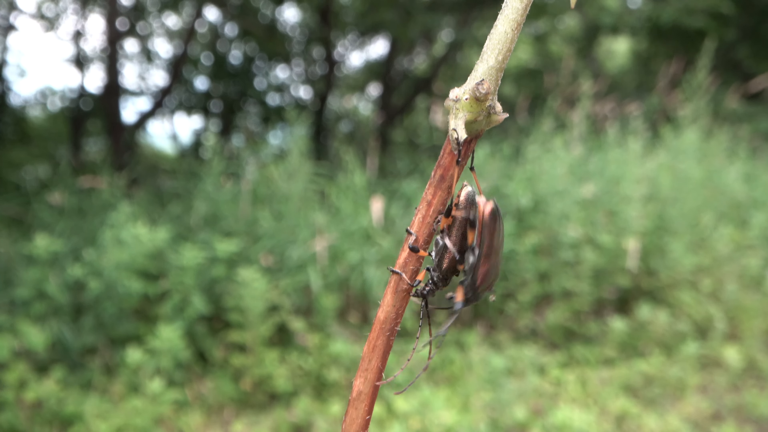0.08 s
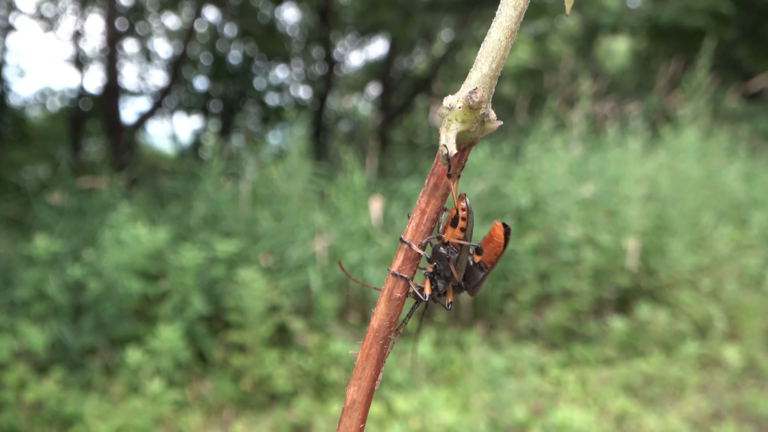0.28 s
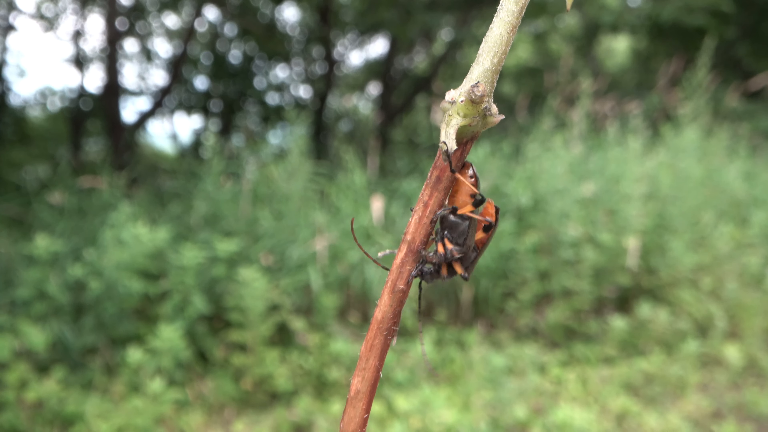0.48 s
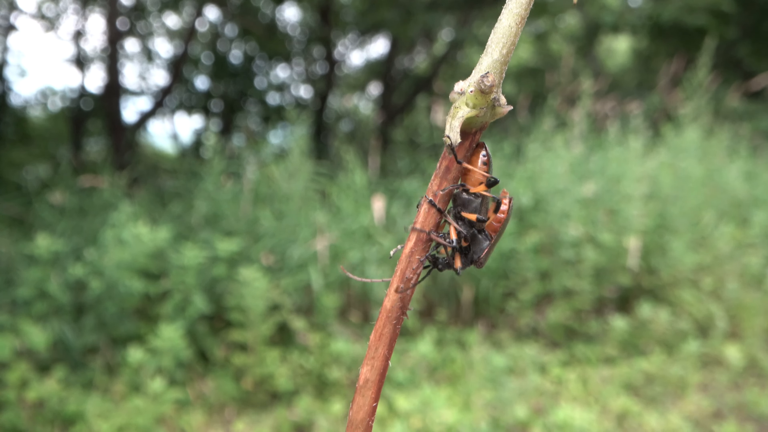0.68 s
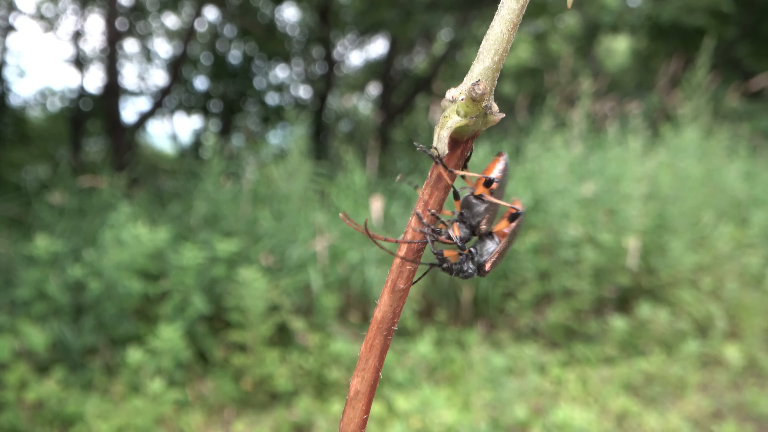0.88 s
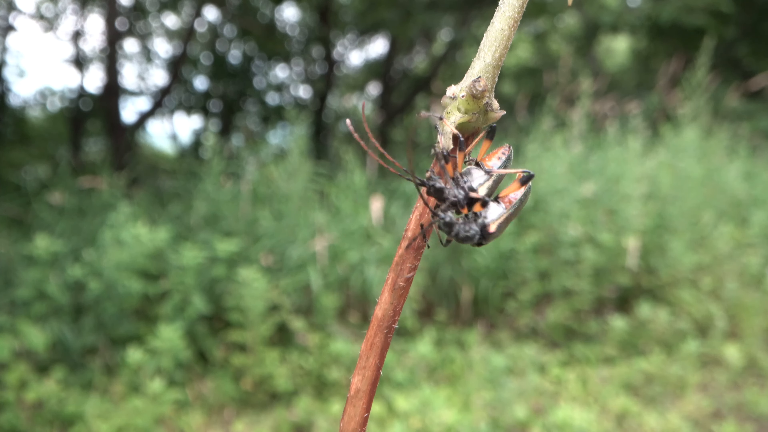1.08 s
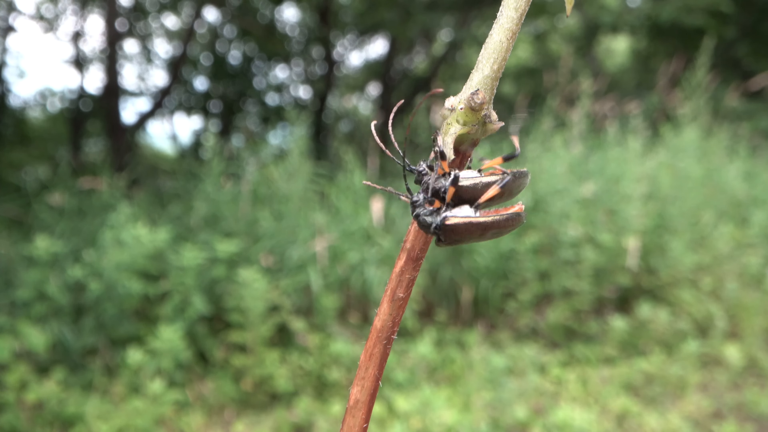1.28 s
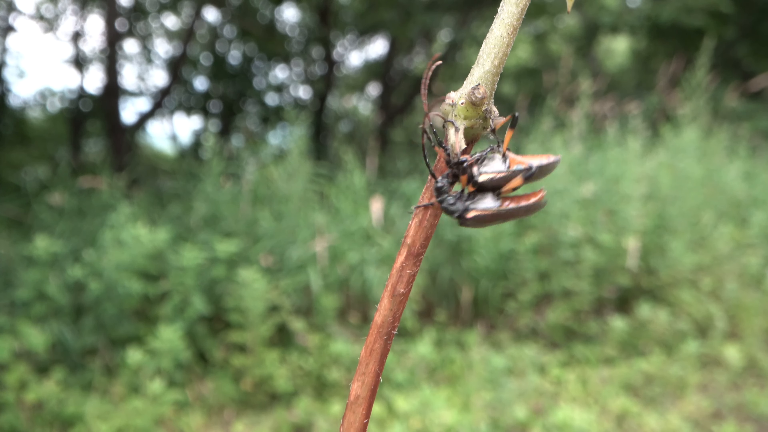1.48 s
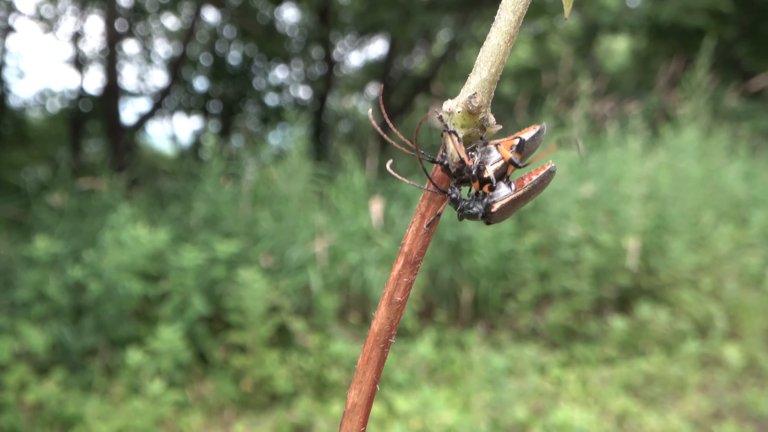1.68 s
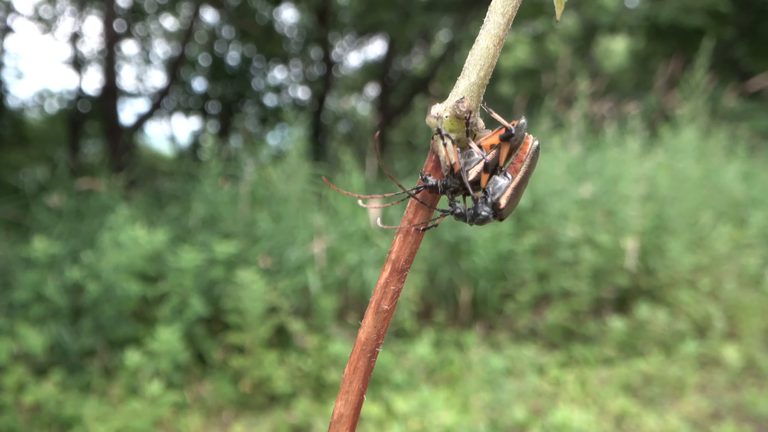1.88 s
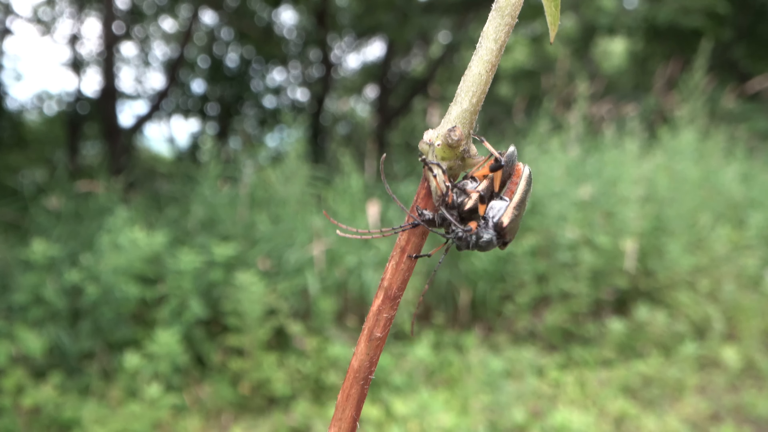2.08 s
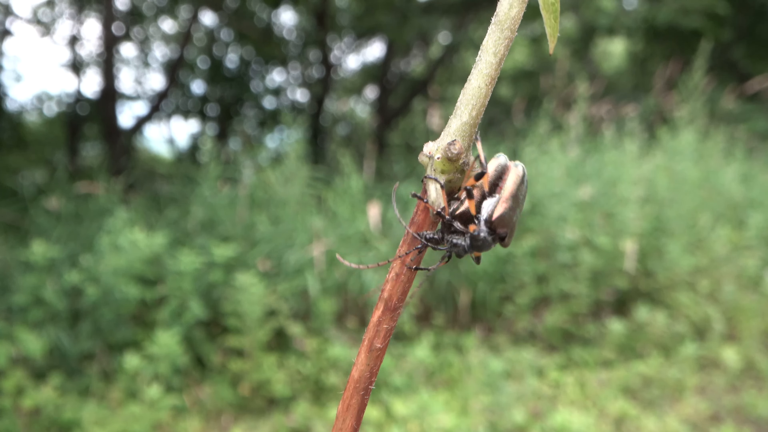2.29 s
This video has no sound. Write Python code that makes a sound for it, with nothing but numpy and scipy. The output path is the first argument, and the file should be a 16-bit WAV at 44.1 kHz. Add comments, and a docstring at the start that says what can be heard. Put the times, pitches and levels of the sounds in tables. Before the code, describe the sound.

Beetle claws crackle and scrape on a plant stem, very close, thinning into scattered ticks

```python
"""Beetles grappling on a stem

Two mating beetles grapple on a plant stem, heard from very close: a busy first second, then scattered ticks.
Claws snap and scrape (sharp slips), legs knock dully (soft bumps), and twice a shell squeaks (regular slips).
Each of these contacts, and the faint shuffling of feet, sets off the same few resonances of the stem.
The stem then rings on as decaying noise, over a low rumble of swaying and a steady rush."""
import sys
import numpy as np
from scipy import signal
from scipy.fft import rfft, irfft
from scipy.io import wavfile
from scipy.ndimage import uniform_filter1d

SR = 44100
rng = np.random.default_rng(int(sys.argv[2]) if len(sys.argv) > 2 else 0)


def master(y):
    """Save y as 16-bit WAV."""
    cut = np.clip(np.atleast_2d(y).T, -1, 1)
    pcm = np.round(cut * 32767)  # scale
    wavfile.write(sys.argv[1], SR, pcm.astype(np.int16))


N = 103635  # length in samples
EDGE_HZ = 15900  # upper edge of the sound
SNAP_S = .004  # room for one snap and its afterslips; also sets the scale of snaps and knocks


def amp(db):
    """Turns decibels into a plain factor."""
    return 10 ** (np.asarray(db) / 20)


def evened(x):
    """Scales a sound to an average (RMS) level of one."""
    return x / np.sqrt(np.mean(x ** 2) + 1e-20)


def read(points, hz):
    """Joins points by straight lines on a log-frequency axis."""
    f, value = np.transpose(points)
    return np.interp(np.log(hz + 1), np.log(f + 1), value)


def add(mix, s, sound):
    """Lays a sound into the mix at s seconds, cutting off what runs past the end."""
    part = mix[max(round(s * SR), 0):][:len(sound)]
    part += sound[:len(part)]


# Claws letting go. Each row: time in seconds, relative level in dB, extra bass in dB, extra treble in dB.
SNAPS = [(0.1609, -40, 6, -9), (0.2101, -32.5, 5, 2.5), (0.2272, -19.5, 3, -10), (0.244, -26.5, 1, 4),
         (0.2453, -28.5, 6, -13), (0.2508, -23, 8.5, -1), (0.26, -19, 9.5, -2.5), (0.2773, -31, 12, 3.5),
         (0.2987, -27, 9.5, -16), (0.309, -25, 1, -22), (0.32, -23.5, 8.5, 2.5), (0.394, -25.5, 15.5, 0),
         (0.3991, -19.5, -4, -0.5), (0.4147, -24, 16.5, 2), (0.4193, -24.5, 15, 6),
         (0.4245, -20.5, -11, 2.5), (0.4304, -23, 4, 4), (0.4398, -22, 8, -9), (0.4616, -19.5, -1, 8.5),
         (0.476, -21, -7, 5), (0.4876, -20.5, 3, -9), (0.5091, -14.5, -0.5, -11), (0.5239, -19.5, -18, 7),
         (0.5266, -26, 4, 13), (0.5985, -37, -10, -9), (0.6398, -17.5, 0.5, -10), (0.641, -14.5, -8, -3.5),
         (0.6731, -25, 9, 3), (0.7408, -29, 7.5, 1), (0.7473, -26, -2, -17), (0.7619, -23, 3.5, 1),
         (0.7638, -20, -17, -1.5), (0.7966, -14.5, 5.5, 9), (0.7991, -13.5, -16, 4.5),
         (0.7983, -7.5, -5.5, -9), (0.8021, -11, 1.5, -15), (0.8043, -14.5, -5.5, 4),
         (0.8078, -25.5, 10, 6), (0.831, -27.5, -2, -2), (0.8436, -23, 2.5, -6), (0.8638, -30.5, 4, -9),
         (0.8774, -20.5, -1, 5.5), (0.8856, -12.5, -2.5, 3), (0.8871, -8.5, 2.5, 4.5),
         (0.8879, -15.5, 2.5, -3), (0.9059, -15, 8, -10), (0.973, -24.5, -41, -6), (1.0337, -31, -11, -15),
         (1.1059, -33, 1, 9), (1.1559, -35, 3, -9), (1.2227, -37, 7, 6), (1.2579, -44, 11, 7),
         (1.3053, -32, -9, -2.5), (1.311, -34, 2, -1), (1.3334, -33, 0, -36), (1.3953, -29.5, -1, -33),
         (1.4494, -29, 16.5, -22), (1.4617, -24, 13, -3), (1.4715, -30.5, 6, 3), (1.4893, -35.5, -4, 16),
         (1.4992, -25.5, 5, -2), (1.538, -31, -2, -9), (1.6692, -26.5, 0, -10), (1.7039, -28, 9, 3.5),
         (1.861, -27.5, 11.5, 5.5), (1.9132, -32, 8, 2), (1.9346, -12, -63, 2.5), (1.9474, -24, 10, 13.5),
         (1.9918, -31.5, -30, 1.5), (2.0273, -34.5, 13.5, 5.5), (2.0362, -28, 12, -12),
         (2.0633, -26, 10, -4), (2.0746, -35, 18, 2), (2.09, -30.5, -4, 0), (2.188, -34.5, 4, -4),
         (2.3214, -24.5, -19, -7)]
AFTERSLIP_S, AFTERSLIP_DB = .0016, -15.5  # latest start of an afterslip, and its typical level
CATCH_S = .00014  # an afterslip catches again this soon, so it has little bass


def snaps(count=4):
    """A claw lets go: one sharp slip, then a few weak ones that catch again at once."""
    out = np.zeros(N)
    chances = rng.random((len(SNAPS), count, 2))
    for (s, db, bass_db, treble_db), chance in zip(SNAPS, chances):
        push = np.zeros(round(SR * SNAP_S))
        push[0] = 1
        for when, size in chance:
            slip = amp([AFTERSLIP_DB]) * (2 * size - 1) * 2
            add(push, when * AFTERSLIP_S, slip)
            add(push, when * AFTERSLIP_S + CATCH_S, -slip)
        sound = np.convolve(push, tick(s, bass_db, treble_db, top_db=-1))
        add(out, s, sound * amp(db) / np.linalg.norm(push))
    return out * np.sqrt(SNAP_S * SR)


# Dragging strokes. Each row: start in seconds, length before the release is added in seconds,
# relative level in dB, extra bass in dB, extra treble in dB.
SCRAPES = [(0.198, 0.067, -42.5, 10.5, 2), (0.235, 0.053, -37.5, 11, -7), (0.295, 0.068, -35.5, 9, 4),
           (0.39, 0.058, -27.5, 11.5, -1.5), (0.45, 0.031, -23, 2, -0.5), (0.486, 0.069, -35.5, 6, 3.5),
           (0.539, 0.06, -33, 6.5, 4), (0.611, 0.036, -28, 8, -1), (0.664, 0.04, -39, 9, -7),
           (0.779, 0.012, -31, 6, 2), (0.793, 0.022, -21.5, 3, -2), (0.823, 0.03, -32.5, 2.5, -1),
           (0.88, 0.042, -27.5, 4, -3.5), (0.925, 0.023, -21.5, 1, 10.5), (0.951, 0.022, -26.5, -2, 7.5),
           (0.99, 0.12, -49.5, -2, 7), (1.088, 0.033, -41.5, 6.5, 10), (1.141, 0.031, -45, 14, 5.5),
           (1.198, 0.033, -43.5, 8.5, 6), (1.293, 0.054, -46, 6, -10), (1.381, 0.034, -41, 14.5, 0),
           (1.456, 0.039, -24.5, 7, -6.5), (1.497, 0.026, -41, 5, 4.5), (1.528, 0.026, -31, 3, -2),
           (1.563, 0.057, -46.5, -1, 0), (1.663, 0.03, -40.5, 16.5, -1), (1.725, 0.052, -49.5, 19, -13),
           (1.841, 0.021, -42.5, 12, 1), (1.905, 0.071, -46, 10, 0), (2.02, 0.029, -38.5, 12.5, -8),
           (2.057, 0.024, -34, 13.5, -13), (2.092, 0.042, -45.5, 11.5, -0.5),
           (2.195, 0.053, -53.5, 25, -12), (2.322, 0.032, -45, 12, -5)]
SCRAPE_DB, SCRAPE_SAG_DB = -0.5, -1  # overall level; change of level along a stroke
SCRAPE_ATTACK_S, SCRAPE_RELEASE_S = 0.0038, 0.0082


def scrapes(count=4):
    """Several claws drag over bark and shell: dense slips under a short stroke."""
    out = np.zeros(N)
    trains = [slips(2 * N) for claw in range(count)]
    for s, length, db, bass_db, treble_db in SCRAPES:
        t = np.arange(0, length + SCRAPE_RELEASE_S, 1 / SR)
        rise, fall = t / SCRAPE_ATTACK_S, (t[-1] - t) / SCRAPE_RELEASE_S
        stroke = np.clip(np.minimum(rise, fall), 0, 1)
        level = amp(db + SCRAPE_SAG_DB * (t / length - .5))
        for train in trains:
            drive = evened(train[round(s * SR):][:len(t)]) * stroke * level
            add(out, s, signal.fftconvolve(drive, tick(s, bass_db, treble_db, top_db=0)))
    return out * amp(SCRAPE_DB) / np.sqrt(count)


GRAINS_PER_S, GRAIN_SPREAD_DB = 990, 3.5  # average number of slips; how unequal they are


def slips(count):
    """A random train of tiny slips, a few much larger than the rest."""
    size = amp(GRAIN_SPREAD_DB * np.minimum(rng.exponential(1, count), 4))
    sign = rng.choice([-1, 1], count)
    happens = rng.random(count) < GRAINS_PER_S / SR
    return evened(size * sign * happens)


# Where the tone of a hard contact can be bent, from bass to the very top.
LOW_HZ, BASS_HZ, MID_HZ, RING_LO_HZ, RING_HI_HZ, TREBLE_HZ, TOP_HZ = 232, 652, 1110, 2050, 3900, 7400, 10200
LOW_DB = -3  # added to the extra bass at the lowest point
MID_DB, MID_SHARE = -1, 0.53  # the lower mids take a share of the extra bass


def tick(s, bass_db, treble_db, top_db):
    """A hard contact, darker or brighter around the main resonance."""
    tone = [(LOW_HZ, bass_db + LOW_DB), (BASS_HZ, bass_db), (MID_HZ, MID_DB + MID_SHARE * bass_db),
            (RING_LO_HZ, 0), (RING_HI_HZ, 0), (TREBLE_HZ, treble_db), (TOP_HZ, treble_db + top_db)]
    return contact(s, tone, 2300, 5000, grip=1)


# How the stem answers a contact. Each row: frequency in Hz, relative level in dB.
STEM = [(25, -29), (45, -29), (70, -20), (100, -17.5), (145, -10.5), (200, -6.5), (260, 0), (380, -4.5),
        (500, -7), (670, -3), (820, -10), (1000, -16), (1200, -11.5), (1750, -11), (2120, -8), (2350, -9),
        (2560, -2.5), (2820, -3.5), (3230, 3), (3500, 0.5), (4000, -12), (4900, -12), (5400, -24),
        (5850, -17), (6650, -24.5), (7250, -13), (7620, -6.5), (8050, -15.5), (8800, -23), (10700, -27),
        (12200, -35), (14500, -35.5), (16000, -50)]
# One resonance rises as the beetles climb toward the node of the stem, after sinking a little at first.
# Each row: time in seconds, frequency in Hz.
CLIMB = [(.2, 1620), (.5, 1450), (.9, 1440), (1.3, 1860), (2.3, 1840)]
CLIMB_DB, CLIMB_WIDTH = 6.5, 0.092  # height of that resonance; width as a share of its frequency
GRIP_SPREAD, GRIP_PATCH_DB = 0.018, 2.5  # each foothold shifts and recolours the resonances
TRAVEL_S = 0.000982  # lag of a 1 kHz bending wave; higher ones arrive sooner


def contact(s, tone, lo_hz, hi_hz, grip=0, size=2048):
    """The stem's answer to one contact at time s, treble first, scaled by its energy in a band."""
    signed = np.fft.fftfreq(size, 1 / SR)
    hz = abs(signed)
    chance = grip * rng.standard_normal(25)
    places = np.linspace(0, np.sqrt(EDGE_HZ), len(chance) - 1)
    patches = np.interp(np.sqrt(hz), places, chance[1:])
    climb_hz = np.interp(s, *np.transpose(CLIMB))
    moving = np.exp(-.5 * ((hz / climb_hz - 1) / CLIMB_WIDTH) ** 2)
    stem_db = read(STEM, hz * np.exp(GRIP_SPREAD * chance[0]))
    gain = amp(stem_db + read(tone, hz) + GRIP_PATCH_DB * patches + CLIMB_DB * moving)
    gain = gain / np.sqrt(np.mean(gain ** 2 * (hz > lo_hz) * (hz < hi_hz)))
    # The Hilbert step makes each resonance start at once; the turns then delay the low waves most.
    prompt = np.conj(signal.hilbert(np.log(gain)))
    turns = 2 * TRAVEL_S * np.sign(signed) * np.sqrt(1000 * hz)
    return np.fft.ifft(np.exp(prompt - 2j * np.pi * turns)).real[:size // 2]


# Dull bumps of legs and bodies. Each row: time in seconds, relative level in dB, upper pitch in Hz.
KNOCKS = [(.254, -24.5, 1060), (.339, -17.5, 775), (0.35, -18, 820), (0.4208, -18.5, 557), (.445, -23, 764),
          (.4675, -17.5, 620), (0.553, -27.5, 970), (.652, -21, 760), (1.151, -23.5, 560),
          (1.288, -27.5, 464), (1.399, -31, 706), (1.437, -22, 630), (1.477, -19, 593), (1.5, -20.5, 563),
          (1.7213, -20.5, 547), (1.745, -23, 614), (1.822, -20.5, 493), (1.883, -25, 450),
          (1.892, -22, 497), (1.8985, -25, 544), (2.12, -27.5, 710), (2.232, -27, 635)]
# Tone of a knock. Each row: multiple of its pitch, relative level in dB.
KNOCK_TONE = [(.06, -6), (.25, -9), (.55, 3.5), (1, 0), (1.8, -11), (4.5, -25), (14, -39)]
KNOCK_DB = -2.5  # overall level


def knocks():
    """Soft bumps drive mostly the low resonances; those with a higher pitch reach further up."""
    out = np.zeros(N)
    for s, db, hz in KNOCKS:
        tone = [(multiple * hz, level) for multiple, level in KNOCK_TONE]
        add(out, s, amp(db) * contact(s, tone, 120, 1000, grip=1))
    return out * amp(KNOCK_DB) * np.sqrt(SNAP_S * SR)


# Stick-slip squeaks, one curve each. Each row of a curve: time in seconds, slips per second in Hz, level in dB.
SQUEAKS = [
    [(1.763, 1030, -38), (1.772, 1028, -30), (1.778, 883, -28.5), (1.784, 1061, -29.5), (1.803, 1007, -27),
     (1.811, 1160, -25), (1.818, 1180, -39)],
    [(2.256, 770, -54), (2.265, 858, -40), (2.276, 940, -38.5), (2.281, 1185, -45), (2.289, 1160, -33.5),
     (2.306, 1263, -38), (2.316, 1090, -50)],
]
# Character of each squeak. Each row: extra treble in dB, pitch jitter as a share of the pitch.
SQUEAK_TONES = [(5, 0.069), (-1.5, 0.037)]
# Tone shared by the squeaks. Each row: frequency in Hz, relative level in dB.
SQUEAK_TONE = [(300, -23), (1000, 0.5), (1400, -6), (2100, 2.5), (2600, -1.5), (3300, 1.5), (4800, 1.5),
               (7000, -0.5), (8200, 7), (10500, -4), (15000, 1)]
SQUEAK_GRIT = .25  # share of noise mixed into the slips


def squeaks():
    """Shell slides on shell, and the slips fall into a nearly regular train."""
    out = np.zeros(N)
    noises = rng.standard_normal((len(SQUEAKS), N))
    for curve, (treble_db, jitter), noise in zip(SQUEAKS, SQUEAK_TONES, noises):
        s, hz, db = np.transpose(curve)
        t = np.arange(s[0], s[-1], 1 / SR)
        wobble = evened(uniform_filter1d(noise[:len(t)], size=30))
        rate = np.interp(t, s, hz) * (1 + jitter * wobble)
        turns = np.cumsum(rate) / SR
        pulses = evened(sum(np.cos(2 * np.pi * k * turns) for k in range(1, 14)))
        train = pulses + SQUEAK_GRIT * noise[-len(t):]
        # The extra treble is a bump around TREBLE_HZ.
        tone = [(f, level + treble_db * np.exp(-np.log2(f / TREBLE_HZ) ** 2 * 10))
                for f, level in SQUEAK_TONE]
        sound = signal.fftconvolve(train, contact(s[0], tone, 2300, 5000))[:len(t)]
        add(out, s[0], evened(sound) * amp(np.interp(t, s, db)))
    return out


# Faint shuffling of feet between the strokes. Each row: time in seconds, relative level in dB.
SHUFFLE = [(0, -66.5), (.13, -59), (.2, -55.5), (.38, -47), (.6, -44), (.73, -46), (.99, -44),
           (1.07, -49.5), (1.269, -51), (1.44, -48.5), (1.63, -54), (1.8, -47.5), (1.9, -50), (2.0, -49),
           (2.16, -58), (2.23, -55.5), (2.35, -49.5)]
# Tone of the shuffling. Each row: frequency in Hz, relative level in dB.
SHUFFLE_TONE = [(100, 9.5), (200, 10), (380, 17.5), (700, 10.5), (1100, -3), (1900, 4), (3200, -0.5),
                (7500, 0.5), (14000, 5)]


def shuffle():
    """Feet never quite rest: tiny random slips make a faint, dull patter."""
    level = amp(np.interp(np.arange(N) / SR, *np.transpose(SHUFFLE)))
    step = contact(N / SR / 2, SHUFFLE_TONE, 2300, 5000)
    return signal.fftconvolve(slips(N) * level, step)[:N]


# Ringing of the stem. Each row: frequency in Hz, time to fall by 60 dB in seconds, relative level in dB.
RING = [(60, .3, 6.5), (110, 0.26, -9.5), (276, 0.083, -8.5), (660, 0.023, -13.5), (1470, 0.017, 3),
        (3560, 0.03, -15), (8300, 0.017, -16), (16000, 0.019, 9)]


def ringing(x):
    """Waves run up and down the stem, as noise that dies away; the low ones last longest."""
    hz, t, z = signal.stft(rng.standard_normal(SR // 2), SR, nperseg=256)
    ring = np.array(RING)
    t60 = read(ring[:, :2], hz)[:, None]
    db = read(ring[:, ::2], hz)[:, None]
    # The square root keeps the energy independent of how long a band rings.
    z = z * amp(db - 60 * t / t60) * np.sqrt(2 * np.log(1000) / (t60 * SR))
    return signal.fftconvolve(x, signal.istft(z, SR)[1])[:N]


# Low rumble of the stem under the struggle. Each row: time in seconds, level in dB.
SWAY = [(0, -65), (.1, -62), (.15, -53), (.26, -60), (.32, -39), (.4, -61), (.6, -51), (.68, -35),
        (.76, -46), (.82, -34.5), (.97, -44.5), (1.05, -55), (1.35, -54.5), (1.44, -53), (1.5, -33),
        (1.57, -64), (1.93, -47.5), (2.35, -63.5)]
# Tone of the sway. Each row: frequency in Hz, relative level in dB.
SWAY_TONE = [(15, -34), (32, -7), (46, -7.5), (70, -6.5), (100, 3.5), (135, -0.5), (220, -54), (600, -64),
             (2000, -90)]


def sway():
    """The whole stem trembles when the beetles shift their weight: low noise that swells and fades."""
    return rush(SWAY_TONE) * amp(np.interp(np.arange(N) / SR, *np.transpose(SWAY)))


def rush(tone):
    """Noise of unit level with the given spectrum."""
    spectrum = rfft(rng.standard_normal(N))
    return evened(irfft(spectrum * amp(read(tone, np.fft.rfftfreq(N, 1 / SR))), N))


# Tone of the steady background. Each row: frequency in Hz, relative level in dB per Hz.
FLOOR = [(30, -22), (90, -7), (190, -1.5), (400, -8), (750, -4.5), (1400, -10.5), (2500, -21), (7000, -26),
         (15500, -29)]
FLOOR_DB = -49.5  # overall level


def background():
    """Low, even rush with a little hiss."""
    return amp(FLOOR_DB) * rush(FLOOR)


BALANCE_DB, SIDE_DB = 1.14, -72  # first channel over second; separate noise in each channel


def scene():
    """Contacts make the stem ring; sway and background join, then all spreads to two channels."""
    contacts = snaps() + scrapes() + knocks() + squeaks() + shuffle()
    stem = contacts + ringing(contacts) + sway() + background()
    balance = amp([[BALANCE_DB / 2], [-BALANCE_DB / 2]])
    return stem * balance + amp(SIDE_DB) * rng.standard_normal((2, N))


OVERLOAD = 0.93  # largest amplitude that the input can take


def record(dry):
    """Peaks that overload the input are clipped; then a filter removes what lies above the edge."""
    clipped = np.clip(dry, -OVERLOAD, OVERLOAD)
    lowpass = signal.firwin(255, EDGE_HZ, window=("kaiser", 8), fs=SR)
    return signal.oaconvolve(clipped, lowpass[None], "same")


dry = scene()
out = record(dry)
master(out)
```